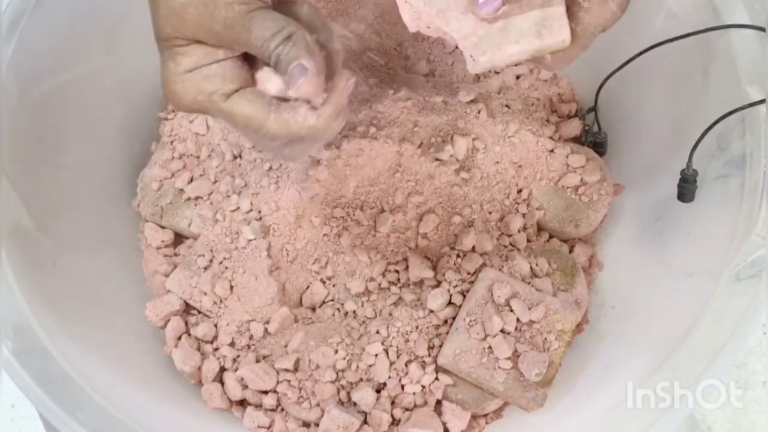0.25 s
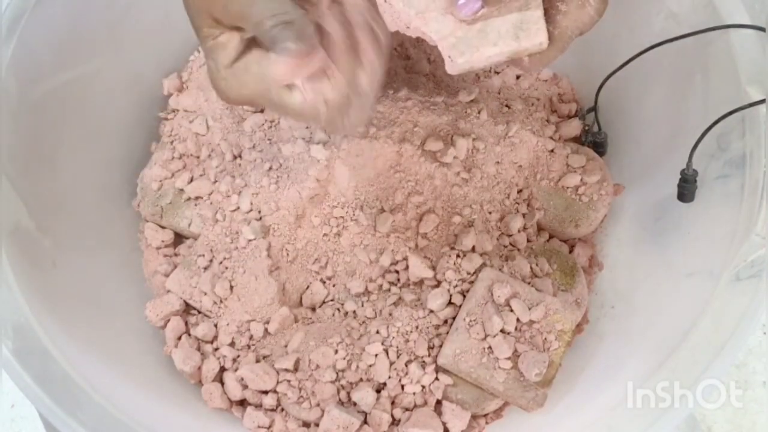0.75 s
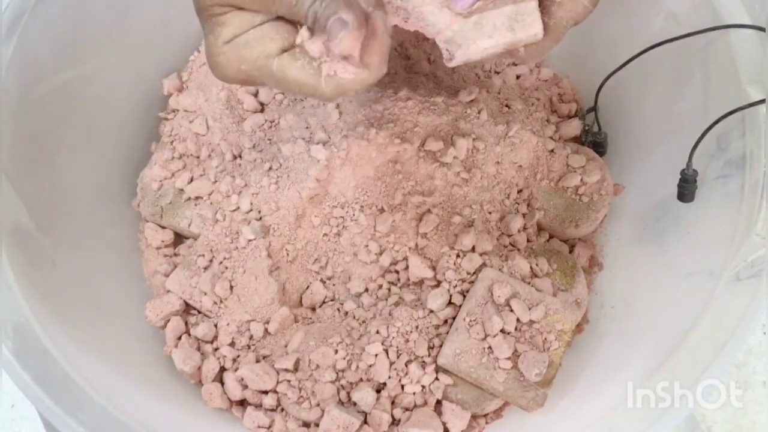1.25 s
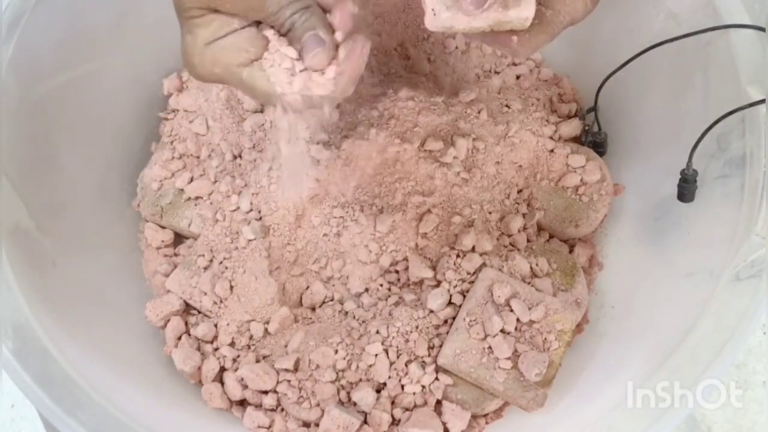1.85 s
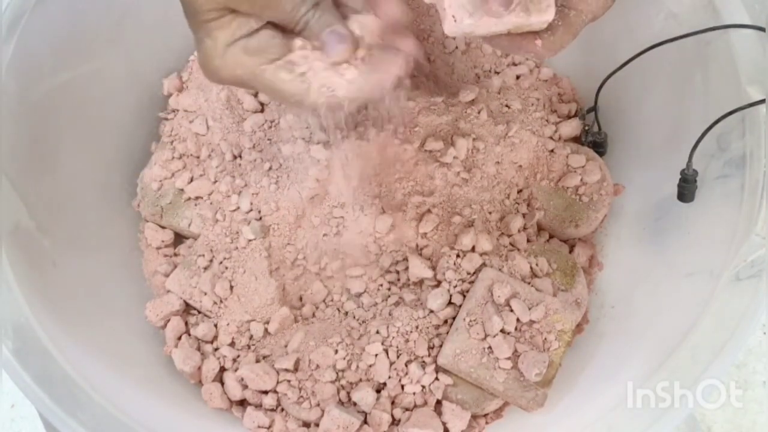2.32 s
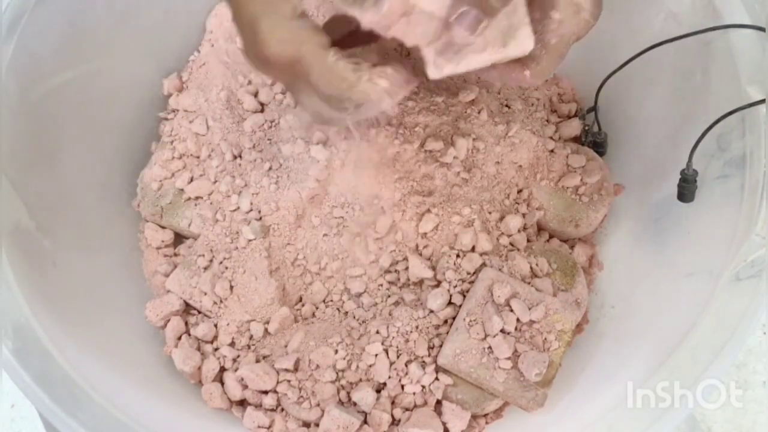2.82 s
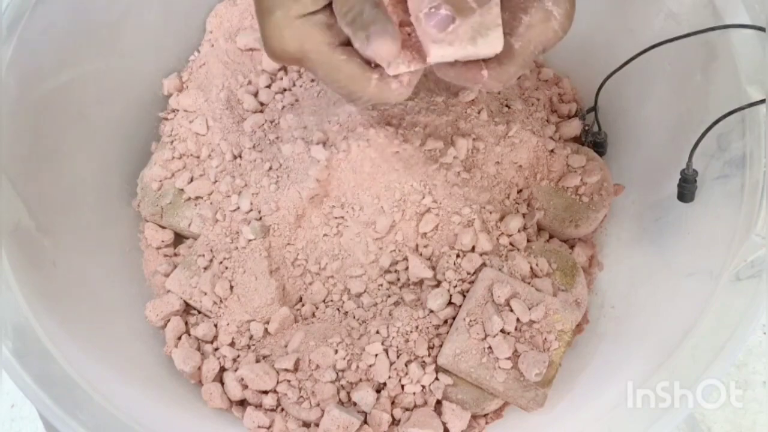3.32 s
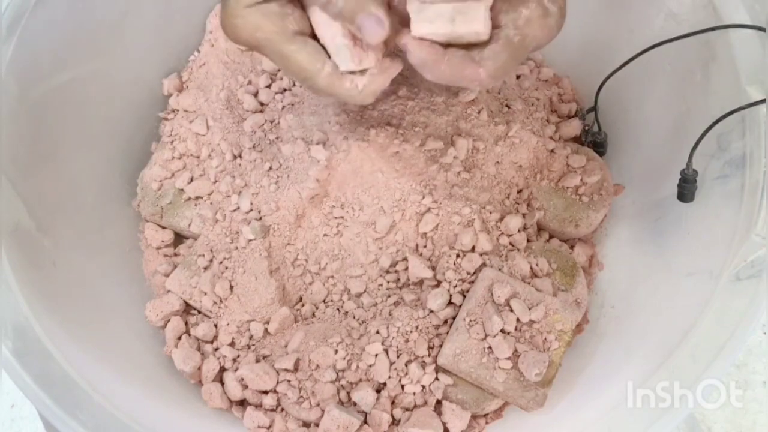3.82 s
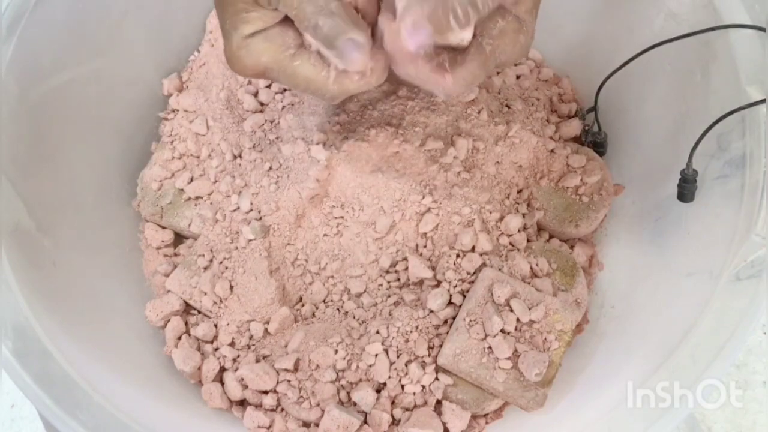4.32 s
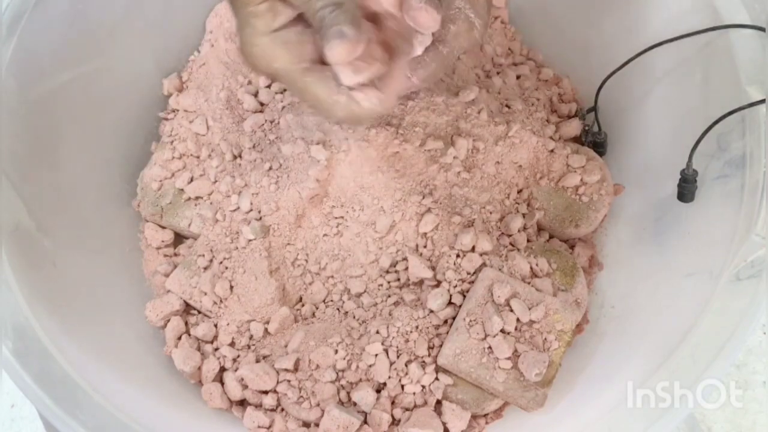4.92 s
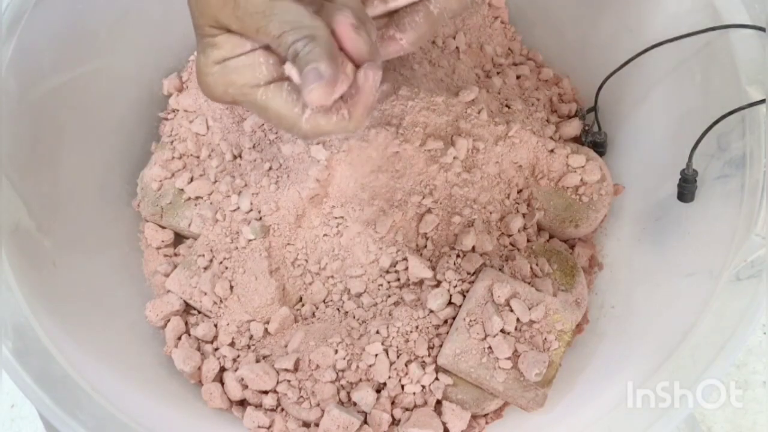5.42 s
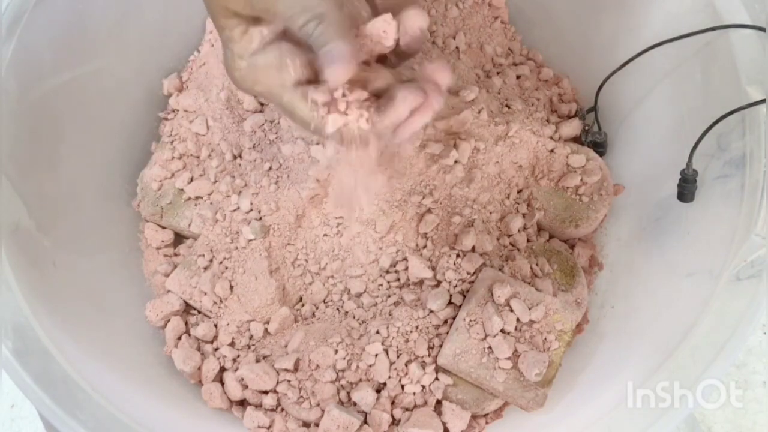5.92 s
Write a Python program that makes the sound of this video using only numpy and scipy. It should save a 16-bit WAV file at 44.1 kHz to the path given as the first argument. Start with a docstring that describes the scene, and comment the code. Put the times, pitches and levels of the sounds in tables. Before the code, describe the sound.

Fingers crush soft chalk over a plastic tub, with dry cracks, crumbling crunches, sifting powder hiss and pattering crumbs, close and dry.

```python
"""Fingers crush soft chalk over a plastic tub, heard by a small microphone lying in it. Slow air sway drifts in
level throughout, with room rumble and a wavering hum; rubbing, powder hiss and pattering crumbs start at once.
Lumps crack and land from the start, hard near 1.15 s and hardest near 2.27 s. From 4.3 to 5.2 s no large
cracks: strokes, crumbs, small chips and low rumble surges go on; then a last volley of cracks closes the scene.
Knocks are pulses with noisy tails through resonances; the beds are shaped noise; dull bumps are sine rings."""
import sys
import numpy as np
from scipy import signal
from scipy.fft import rfft, irfft, next_fast_len
from scipy.io import wavfile
from scipy.ndimage import uniform_filter1d, map_coordinates

SR = 44100
rng = np.random.default_rng(int(sys.argv[2]) if len(sys.argv) > 2 else 0)


def bounce(signal):
    """Save signal as a 16-bit WAV file at the path given by the first command-line argument."""
    frames = np.transpose(np.atleast_2d(signal))
    limited = np.clip(frames, -1, 1)
    pcm = np.round(limited * 32767).astype(np.int16)
    wavfile.write(sys.argv[1], SR, pcm)


N = 271215  # samples

# Pressure sway around the microphone. Each row: time in seconds, level in dB.
SWAY_LEVEL = [(0.0, -33), (0.07, -28.5), (0.99, -30), (1.09, -43), (1.18, -26), (1.52, -37.5), (1.75, -28),
              (2.64, -29.5), (2.69, -22.5), (2.89, -37.5), (2.93, -26.5), (3.25, -17.5), (3.32, -34.5),
              (6.15, -27.5)]
# Jolts of the tub that make the rumble surge. Each row: time in seconds, level in dB.
JOLTS = [(.19, -43.5), (1.15, -36.5), (2.27, -46), (2.53, -44.5), (2.9, -47), (3.2, -46.5), (3.87, -42),
         (4.79, -64), (5.03, -48.5), (5.25, -50), (5.67, -45), (5.91, -43), (6.08, -48.5)]
# Narrow bands of hum. Each row: centre in Hz, width in Hz, level in dB.
HUM_BANDS = [(243, 10, -69.5), (355, 44, -87), (427, 1.1, -72.5), (472.7, 44, -71.5), (983, 5.7, -82),
             (3530, 72, -81)]

# Tone of each bed of noise. Each row: frequency in Hz, relative level in dB per Hz.
SWAY_TONE = [(1, 2.5), (3, -9), (6, 3), (10, -16.5), (15, -3.5), (20, -36), (30, -34), (45, -42.5),
             (70, -120)]
RUMBLE_TONE = [(12, -120), (25, -21.5), (50, 4), (90, -4), (130, -8.5), (250, -13.5), (600, -52),
               (1200, -24.5), (3000, -120)]
ROOM_TONE = [(300, -42), (600, -10), (1500, -16.5), (3700, 9), (6500, -0.5), (7500, -47)]
CRUMB_TONE = [(100, -47), (200, 0), (360, 8), (500, 5.5), (700, 1), (1000, -4), (1500, -10.5),
              (2200, -26.5), (4000, -54)]
RUB_TONE = [(700, -64), (1300, -8.5), (1750, -6), (2150, -0.5), (2550, -5.5), (3200, -6.5), (4500, -19.5),
            (7000, -64)]
POWDER_TONE = [(1500, -59), (3000, -12.5), (3700, -1.5), (4600, -2), (5500, 0.5), (6500, 2), (6900, -5.5),
               (7300, -83.5), (7800, -60)]

# Crumbs falling on the heap. Each row: time in seconds, level in dB.
CRUMB_FALL = [(0.0, -58), (0.55, -56.5), (0.91, -59), (1.18, -55), (1.28, -54.5), (1.47, -57.5),
              (1.71, -60), (1.95, -54), (2.3, -53), (2.46, -53), (2.64, -58), (2.84, -58), (3.1, -54.5),
              (3.32, -63), (3.67, -62.5), (3.87, -58), (4.02, -54.5), (4.16, -56), (4.4, -64.5),
              (4.68, -63.5), (4.88, -60.5), (5.58, -57.5), (5.75, -59), (5.98, -59), (6.1, -53.5),
              (6.15, -54.5)]
# Finger strokes over the chalk. Each row: start in seconds, hold in seconds, powder hiss in dB, finger rub in dB.
STROKES = [(0.044, 0.013, -59, -85), (0.197, 0.018, -49, -56), (0.322, 0.17, -61.5, -60),
           (0.456, 0.079, -61.5, -56.5), (0.587, 0.085, -61, -60), (0.744, 0.03, -69, -73),
           (0.93, .1, -65, -64.5), (1.13, 0.036, -59.5, -59), (1.269, 0.12, -62.5, -63.5),
           (1.426, 0.18, -63.5, -68), (1.75, 0.13, -61.5, -59), (1.96, 0.098, -59.5, -61.5),
           (2.127, 0.038, -61, -72), (2.278, 0.12, -63, -59.5), (2.427, .1, -74, -61.5),
           (2.5, 0.014, -61, -63), (2.589, 0.12, -61, -61.5), (2.896, 0.1, -61, -60),
           (3.016, 0.069, -62, -62), (3.197, 0.02, -68, -70), (3.408, 0.036, -59, -71),
           (3.614, 0.017, -51.5, -58), (3.722, 0.025, -89, -90), (3.838, 0.057, -62.5, -65.5),
           (3.95, 0.042, -60.5, -64.5), (4.06, 0.053, -64.5, -70.5), (4.169, 0.043, -57.5, -58),
           (4.252, 0.059, -58, -54.5), (4.39, 0.096, -60.5, -67.5), (4.577, 0.06, -70, -71),
           (4.686, 0.02, -58.5, -64.5), (4.78, 0.096, -60, -63.5), (4.963, 0.047, -59.5, -64),
           (5.024, 0.065, -66, -66), (5.158, .04, -60, -63.5), (5.25, 0.073, -60.5, -67.5),
           (5.365, .05, -60, -63), (5.451, 0.046, -62.5, -59.5), (5.552, 0.13, -65.5, -69),
           (5.688, 0.12, -60, -55.5), (5.89, 0.12, -64.5, -68.5), (6.066, .05, -66, -66.5)]
# Soft bumps that ring only the tub wall. Each row: time in seconds, level in dB.
BUMPS = [(1.15, -43), (2.277, -27), (2.917, -33), (2.942, -32.5), (3.211, -38), (3.896, -36.5)]
# Cracks and landings. Each row: time in seconds, knock in dB, share of snap against lump from 0 to 1,
# grit in dB, tub thud in dB, t60 of the crumble in seconds.
CRACKS = [(0.078, -61, 0.5, -48, -68, 0.015), (0.13, -59, 0.3, -51, -44, 0.013),
          (0.195, -38, 0.55, -30.5, -45.5, 0.017), (0.201, -29.5, 0.09, -25, -26, 0.031),
          (0.254, -48, 0, -37, -42, 0.023), (0.352, -38, 0.47, -39.5, -54, 0.013),
          (0.375, -51, 0.2, -51, -58, 0.011), (0.422, -32, 0.63, -57, -54, 0.013),
          (0.443, -37.5, 0, -33.5, -38.5, 0.015), (0.472, -38, 0.67, -58, -54, 0.013),
          (0.501, -37, 0.3, -54, -37.5, 0.011), (0.538, -33.5, 0.3, -41.5, -48, 0.02),
          (0.544, -39, 0.26, -51, -58, 0.011), (0.663, -39.5, 0, -57, -46, 0.013),
          (0.735, -38, 0.22, -64, -45, 0.016), (0.894, -38.5, 0.45, -48, -54, 0.013),
          (1.033, -38, 0.13, -46.5, -36, 0.019), (1.148, -26, 0, -35, -25, 0.018),
          (1.162, -22, 0.22, -28, -36, 0.022), (1.175, -37, 0.2, -59, -55, 0.015),
          (1.246, -42, 0.65, -60, -49, 0.012), (1.32, -35, 0.45, -38.5, -37.5, 0.029),
          (1.441, -37, 0.16, -63, -41, 0.025), (1.594, -41.5, 0.26, -63, -64, 0.016),
          (1.673, -50, 0.3, -50, -64, 0.013), (1.796, -33, 0.4, -48, -33.5, 0.019),
          (1.856, -36, 0.17, -51, -39.5, 0.013), (1.881, -36, 0.4, -57, -51, 0.012),
          (1.934, -38.5, 0.06, -52, -41.5, 0.016), (1.957, -36, 0.28, -50, -37, 0.02),
          (2.0, -37, 0.4, -53, -52, 0.013), (2.042, -39.5, 0, -67, -60, 0.016),
          (2.187, -35, 0.05, -58, -45, 0.02), (2.266, -31.5, 0.32, -55, -50, 0.011),
          (2.273, -16, 0.23, -38, -29, 0.021), (2.362, -46, 0.1, -50, -40, 0.013),
          (2.403, -33, 0.17, -47, -44.5, 0.016), (2.433, -34, 0.03, -61, -37.5, 0.013),
          (2.447, -38, 0.03, -57, -39, 0.013), (2.528, -35, 0.06, -38.5, -29.5, 0.019),
          (2.582, -30.5, 0.34, -56, -38.5, 0.022), (2.605, -42.5, 0.15, -58, -63, 0.013),
          (2.858, -51, 0.4, -34.5, -60, 0.01), (2.876, -31, 0.44, -66, -34, 0.013),
          (2.934, -38, 0.7, -66, -66, 0.0099), (2.942, -33, 0.48, -60, -35.5, 0.016),
          (3.067, -37, 0.34, -45, -47, 0.014), (3.145, -35.5, 0.27, -52, -43, 0.023),
          (3.207, -32, 0.5, -35.5, -28, 0.03), (3.518, -39, 0.44, -67, -45, 0.013),
          (3.61, -32, 0.46, -41, -44, 0.015), (3.802, -62, 0.2, -50, -63, 0.013),
          (3.859, -28, 0.31, -29.5, -33.5, 0.018), (3.896, -39, 0.2, -60, -33.5, 0.025),
          (4, -37, 0.6, -60, -60, 0.013), (4.01, -39, 0.4, -55, -65, 0.015),
          (4.148, -40.5, 0.52, -37, -58, 0.013), (4.192, -21.5, 0.53, -36.5, -34.5, 0.016),
          (4.196, -30.5, 0.02, -33.5, -45, 0.039), (4.213, -32, 0.3, -52, -69, 0.024),
          (4.293, -31, 0.42, -43, -32.5, 0.013), (5.215, -45, 0.6, -44, -50, 0.018),
          (5.25, -46, 0.9, -33.5, -67, 0.021), (5.284, -55, 0.5, -38.5, -64, 0.013),
          (5.47, -29, 0.57, -38.5, -39, 0.039), (5.704, -39, 0.23, -34.5, -45, 0.014),
          (5.716, -32, 0.24, -37, -37, 0.018), (5.903, -27, 0.55, -26, -53, 0.0046),
          (5.906, -33, 0.14, -32.5, -67, 0.016), (5.93, -38.5, 0, -34.5, -49, 0.0094),
          (5.934, -25, 0.53, -34, -38, 0.027), (5.981, -43, 0.2, -40, -55, 0.013),
          (6.017, -46, 0.8, -59, -55, 0.015), (6.041, -40.5, 0.6, -49, -52, 0.02),
          (6.086, -24.5, 0, -58, -33.5, 0.027), (6.135, -38, 0.2, -53, -39, 0.018)]

# Resonances a crack sets off. Each row: centre in Hz, width in Hz, relative level in dB.
TUB_MODES = [(83.4, 8, 0.5), (256, 170, -3), (401, 92, 3), (481, 43, 0.5), (591, 30, -2.5)]
LUMP_MODES = [(800, 240, 2.5), (1000, 380, 6.5), (1410, 560, -3)]
SNAP_MODES = [(2180, 305, 10), (2850, 370, -8)]
GRIT_MODES = [(3900, 1000, 12.5), (5100, 1600, 15), (5800, 270, -11)]

RUMBLE_DB, JOLT_T60_S = -56.5, 0.34  # rumble level it wanders about; decay of a surge
SHOWER_DB, SHOWER_T60_S = -13, 0.088  # crumbs shaken loose by a thud: level relative to it, decay
ATTACK_S, RISE_DB, RELEASE_T60_S = 0.027, 13, 0.27  # a stroke gains RISE_DB in each ATTACK_S
DUST_DB, TOUCH_DB = -71, -71  # powder hiss and rub between strokes
WALL_HZ, WALL_T60_S = 344, 0.085  # note of the tub wall
CHIPS, CHIP_T60_S, CHIP_MOST_SNAP = 60, 0.0033, 0.34  # small breaks among the crumbs
CHIP_MEAN_DB, CHIP_SPREAD_DB = [-55, -60, -57.5], 1  # knock, grit, thud
TOP_HZ = 7876  # nothing of the scene passes above this


def amp(db):
    """Gain of a level in dB."""
    return 10 ** (np.asarray(db) / 20)


def unit(x):
    """Scaled to rms 1."""
    return x / np.sqrt(np.mean(x ** 2) + 1e-20)


def noise():
    """White noise as long as the scene."""
    return rng.standard_normal(N)


def level_curve(rows):
    """Gain per sample, gliding in dB between the (seconds, dB) rows."""
    s, db = np.transpose(rows)
    return amp(np.interp(np.arange(N) / SR, s, db))


def wobble(rate):
    """A smooth random curve with rate knots a second."""
    knots = rng.standard_normal(int(N * rate / SR) + 4)
    return map_coordinates(knots, [np.arange(N) * rate / SR])


def filtered(x, response):
    """x through a complex response of frequency."""
    m = next_fast_len(N + SR // 2)
    return irfft(rfft(x, m) * response(np.fft.rfftfreq(m, 1 / SR)), m)[..., :N]


def coloured(x, tone):
    """x shaped by (Hz, dB) points on a log axis, rms 1."""
    f, db = np.transpose(tone)
    return unit(filtered(x, lambda hz: amp(np.interp(np.log(hz + 0.3), np.log(f), db))))


def modes(table):
    """Causal response of resonances that all start together."""
    return lambda f: sum(amp(db) * 1j * f * w / (c * c - f * f + 1j * f * w) for c, w, db in table)


def dying_power(rows, t60):
    """Power envelope: a step at each (seconds, dB) that dies away."""
    s, db = np.transpose(rows)
    power = np.zeros(N)
    np.add.at(power, np.round(s * SR).astype(int), amp(db) ** 2)
    decay = amp(-120 * np.arange(SR // 2) / SR / t60)  # squared, so twice the dB
    return np.abs(signal.fftconvolve(power, decay)[:N])


def air_sway():
    """Slow air pressure at the microphone, mostly below hearing: deep noise riding a level curve."""
    return level_curve(SWAY_LEVEL) * coloured(noise(), SWAY_TONE)


def rumble():
    """Low room noise that wanders in level and surges when the tub is jolted."""
    steady = amp(RUMBLE_DB + 0.87 * wobble(8.9))
    shaking = np.sqrt(steady ** 2 + dying_power(JOLTS, JOLT_T60_S))
    return shaking * coloured(noise(), RUMBLE_TONE)


def hum():
    """Noise through narrow resonances, so each tone wavers by itself."""
    return sum(amp(db) * unit(filtered(noise(), modes([(hz, w, 0)]))) for hz, w, db in HUM_BANDS)


def room_hiss():
    """Steady shaped noise of the room."""
    return amp(-72.5) * coloured(noise(), ROOM_TONE)


def patter(rate, spread_db, smooth, t60, patchy_db):
    """Sparse contacts of very unequal size, each a dying puff, over smooth noise with patches of random colour."""
    hit = rng.random(N) < rate / SR
    size = amp(spread_db * np.minimum(rng.exponential(size=N), 3)) * rng.uniform(-1, 1, N)
    clicks = hit * size
    puff = amp(-60 * np.arange(SR // 50) / SR / t60)
    puffs = signal.fftconvolve(np.abs(clicks), puff)[:N] * rng.standard_normal(N)
    contacts = clicks + 0.11 * puffs

    spectrum = signal.stft(rng.standard_normal(N + 512), nperseg=512)[2]
    patches = uniform_filter1d(rng.standard_normal(spectrum.shape), size=4, axis=0)  # across frequency
    patches = uniform_filter1d(patches, size=14, axis=1)  # across time
    bed = signal.istft(spectrum * amp(patchy_db * unit(patches)), nperseg=512)[1][:N]
    return np.sqrt(1 - smooth) * unit(contacts) + np.sqrt(smooth) * unit(bed)


def stroke_gains():
    """Gains of powder hiss and finger rub: each stroke rises, holds and dies away."""
    t = np.arange(N) / SR
    power = amp([[DUST_DB], [TOUCH_DB]]) ** 2 * np.ones(N)
    for s, hold, *parts_db in STROKES:
        full = s + ATTACK_S
        early = np.maximum(full - t, 0)
        late = np.maximum(t - full - hold, 0)
        shape = amp(-RISE_DB * early / ATTACK_S - 60 * late / RELEASE_T60_S)
        power = power + (amp(parts_db)[:, None] * shape) ** 2
    return np.sqrt(power)


def powder(gain, grip, fine):
    """Powder sifts down: the fine patter as a high hiss under each stroke."""
    return gain * amp(0.7 * grip) * coloured(fine, POWDER_TONE)


def finger_rub(gain, grip, fine):
    """Fingers grind the chalk: the same fine patter coloured lower."""
    return gain * amp(0.9 * grip) * coloured(fine, RUB_TONE)


def crumbs(grip, fine):
    """Crumbs land one by one on a dense bed, with an extra shower after each thud."""
    showers = [(s, thud_db + SHOWER_DB) for s, _, _, _, thud_db, _ in CRACKS]
    falling = np.sqrt(level_curve(CRUMB_FALL) ** 2 + dying_power(showers, SHOWER_T60_S))
    coarse = patter(600, spread_db=3, smooth=0.8, t60=0.008, patchy_db=2.2)
    return falling * amp(1.2 * grip) * coloured(0.6 * fine + coarse, CRUMB_TONE)


def chalk_stream():
    """Powder, rub and crumbs share one fine patter and flutter together with the grip."""
    powder_gain, rub_gain = stroke_gains()
    grip = wobble(45)
    fine = patter(400, spread_db=3.5, smooth=0.6, t60=0.021, patchy_db=3.5)
    return powder(powder_gain, grip, fine) + finger_rub(rub_gain, grip, fine) + crumbs(grip, fine)


def wall_bumps():
    """A dull push sets one note of the tub wall ringing: a decaying sine with a soft start."""
    t = np.arange(SR // 8) / SR
    ring = np.sin(2 * np.pi * WALL_HZ * t) * amp(-60 * t / WALL_T60_S) * (1 - np.exp(-t / 0.0039))
    out = np.zeros(N + len(t))
    for s, db in BUMPS:
        out[round(s * SR):][:len(t)] += amp(db) * ring
    return out[:N]


def chips():
    """Small random breaks, denser where more crumbs fall, as rows like the cracks."""
    share = np.cumsum(level_curve(CRUMB_FALL))
    place, snap = rng.random((CHIPS, 2)).T
    knock, grit, thud = (CHIP_MEAN_DB + CHIP_SPREAD_DB * rng.standard_normal((CHIPS, 3))).T
    when = np.searchsorted(share / share[-1], place) / SR
    return list(zip(when, knock, CHIP_MOST_SNAP * snap, grit, thud, np.full(CHIPS, CHIP_T60_S)))


def struck_body(force, table, soft_hz, small_hz):
    """Resonances driven by a force: soft contact dulls the treble, small size sheds the bass."""
    def body(hz):
        dulling = 1 / (1 + 1j * hz / soft_hz) ** 2
        thinning = (1j * hz / (small_hz + 1j * hz)) ** 2
        return modes(table)(hz) * dulling * thinning

    blow = np.arange(N) == 0
    return filtered(force, body) / np.abs(filtered(blow, body)).max()  # a unit blow peaks at 1


def cracks():
    """One sharp break, then a noisy crumble; it drives tub, lump, snap and grit at their own strengths."""
    t = np.arange(SR // 10) / SR
    force = np.zeros((4, N + len(t)))
    roughness = np.array([[0.06], [0.09], [0.15], [0.25]])  # crumble against break: finer parts are noisier
    for s, knock_db, snap, grit_db, thud_db, t60 in list(CRACKS) + chips():
        knock = amp(knock_db)
        parts = np.array([amp(thud_db), (1 - snap) * knock, snap * knock, amp(grit_db)])
        burst = roughness * rng.standard_normal(len(t)) * amp(-60 * t / t60)
        burst[:, 0] = 1  # the break itself
        force[:, round(s * SR):][:, :len(t)] += parts[:, None] * burst
    tub, lump, snap, grit = force[:, :N]
    return (struck_body(tub, TUB_MODES, soft_hz=1100, small_hz=25)
            + struck_body(lump, LUMP_MODES, soft_hz=2200, small_hz=450)
            + struck_body(snap, SNAP_MODES, soft_hz=4500, small_hz=1300)
            + struck_body(grit, GRIT_MODES, soft_hz=14000, small_hz=2800))


def scene():
    """Everything reaches one microphone."""
    background = air_sway() + rumble() + hum() + room_hiss()
    return (background + chalk_stream() + wall_bumps() + cracks())[None]


def record(dry):
    """The microphone channel rolls off steeply in the treble and stops; a trace of hiss follows it."""
    soft = filtered(dry, lambda hz: (hz < TOP_HZ) / np.sqrt(1 + (hz / 6950) ** 90))
    hiss = filtered(rng.standard_normal(dry.shape), lambda hz: hz < 15700)
    return soft + amp(-99) * hiss


dry = scene()
out = record(dry)
bounce(out)
```